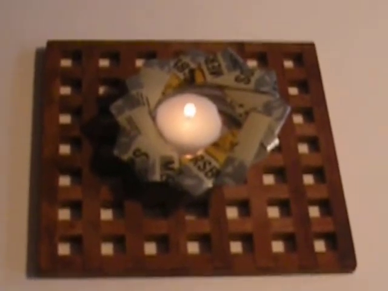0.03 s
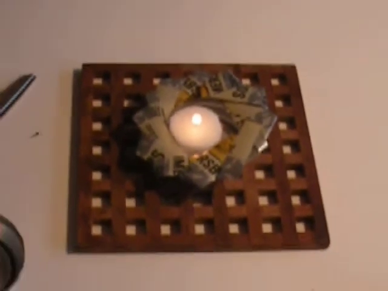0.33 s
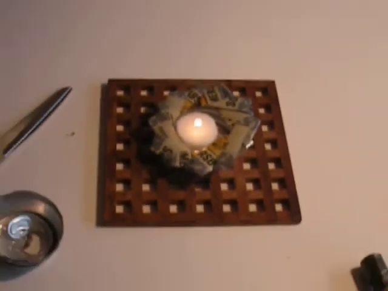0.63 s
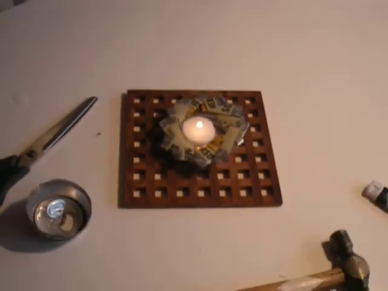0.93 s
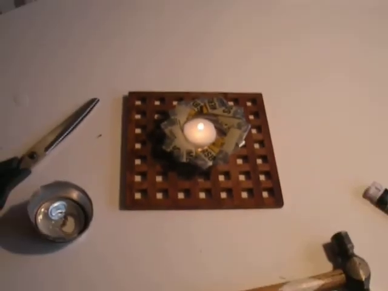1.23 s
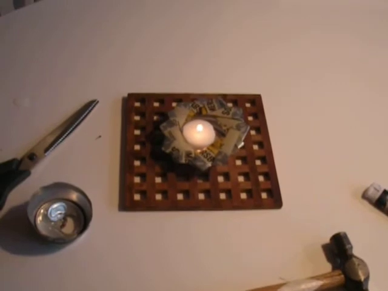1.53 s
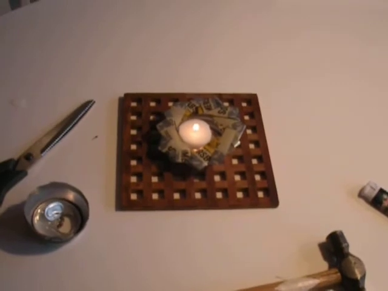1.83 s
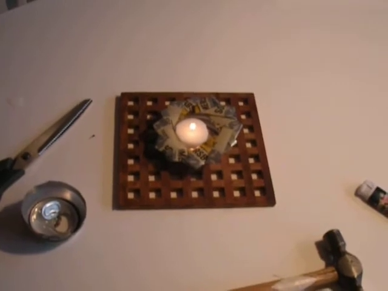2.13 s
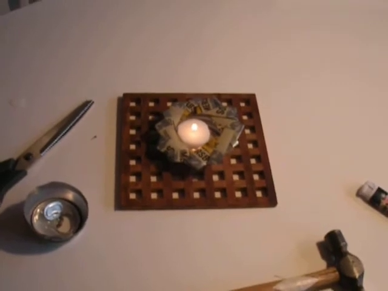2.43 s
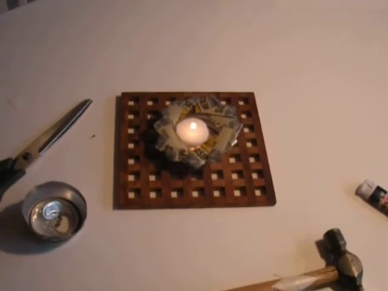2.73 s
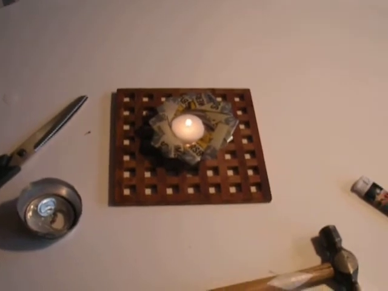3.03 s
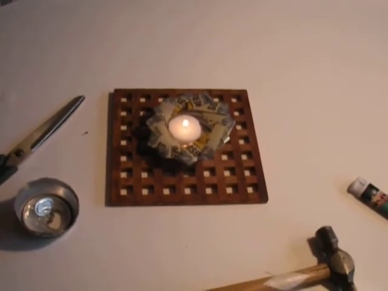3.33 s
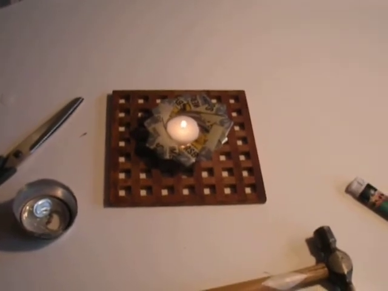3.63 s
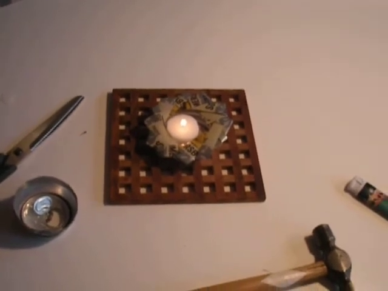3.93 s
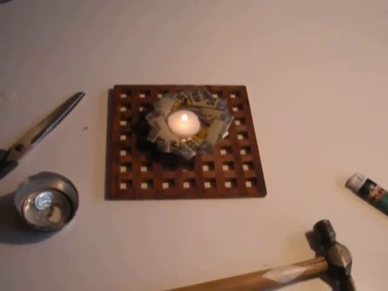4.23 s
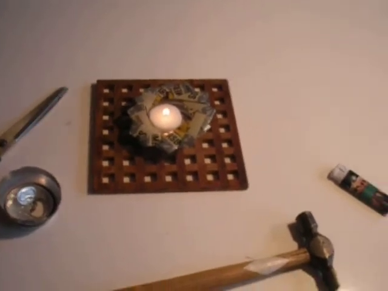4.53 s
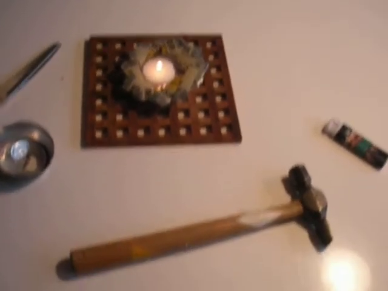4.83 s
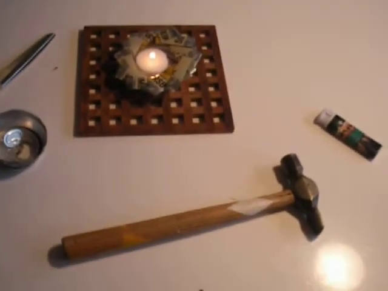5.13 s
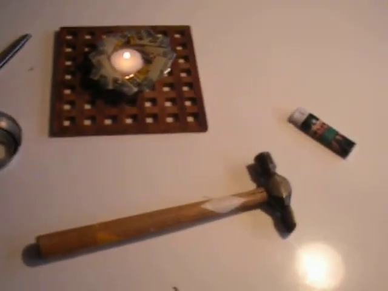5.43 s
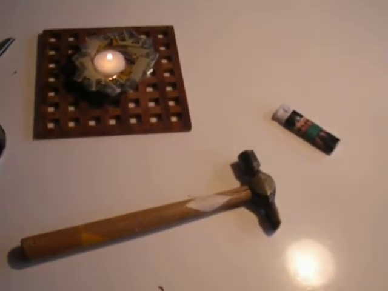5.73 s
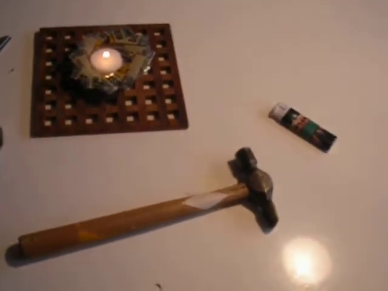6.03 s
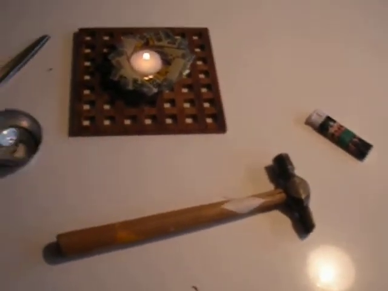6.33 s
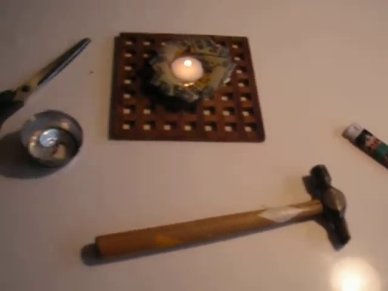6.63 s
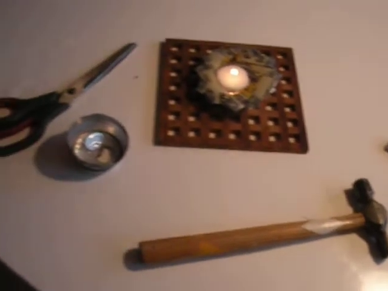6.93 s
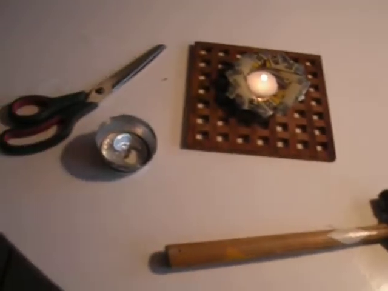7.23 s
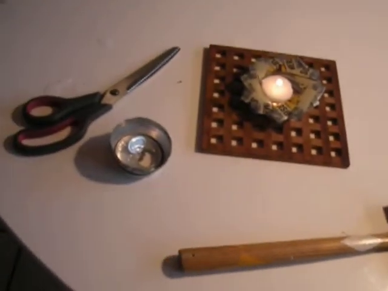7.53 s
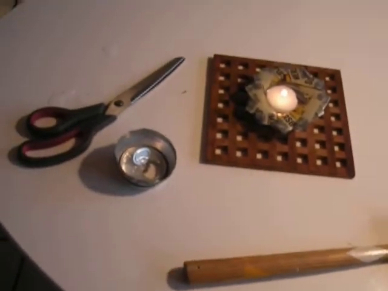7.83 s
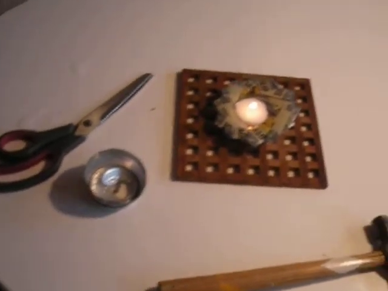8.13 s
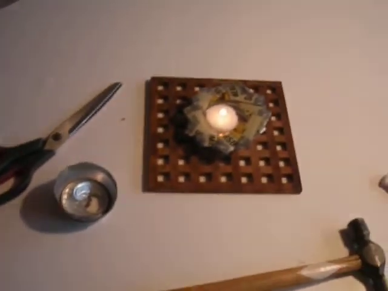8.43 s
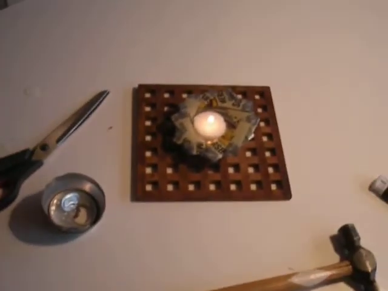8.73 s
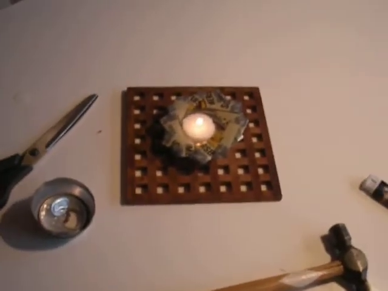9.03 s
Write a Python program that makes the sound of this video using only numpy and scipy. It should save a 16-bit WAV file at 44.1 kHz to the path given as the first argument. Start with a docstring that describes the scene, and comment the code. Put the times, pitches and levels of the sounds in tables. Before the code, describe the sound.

Two sharp clicks from a hand-held camera over steady gritty hiss in a quiet room, followed by a few faint ticks and bumps.

```python
"""A sharp click over gritty hiss in a quiet room, then a second click, light ticks and soft knocks.
Each blow rings the damped modes of a small hand-held camera's case; the hand also rubs it.
Behind: a brief low drone near the end, a very faint clock, appliance hum.
An 8-bit, 8 kHz converter turns the room tone, smaller than one step, into flat two-level hiss."""
import sys
import numpy as np
from scipy import signal
from scipy.fft import rfft, irfft
from scipy.io import wavfile

SR = 44100
rng = np.random.default_rng(int(sys.argv[2]) if len(sys.argv) > 2 else 0)


def master(y):
    """Save y as 16-bit WAV."""
    cut = np.clip(np.atleast_2d(y).T, -1, 1)
    pcm = np.round(cut * 32767)  # scale
    wavfile.write(sys.argv[1], SR, pcm.astype(np.int16))


N = 404397

# case modes, heavily damped, then faint long ones: (frequency [Hz], relative level [dB], t60 [s])
CASE_MODES = [(249, -26.5, 0.023), (419, -17.5, 0.026), (591, -32, 0.059), (740, -16, 0.021),
              (1074, -4.5, 0.01), (1287, -16.5, 0.006), (1864, -5.5, 0.0039), (2281.5, -14.5, 0.0082),
              (2900, -1.8, 0.0063), (3794, -8, 0.0052), (249.7, -54.5, .4), (386.6, -47, .16),
              (440, -46, 0.22), (548, -44, 0.22), (865, -52, 0.28), (1417, -61.5, .2), (3295, -63.5, 0.42)]
# clicks and ticks: (time [s], strength [dB], hardness [dB/octave], node frequency [Hz], node dip [dB])
CASE_CLICKS = [(0.1551, 6, 1.5, 1350, -7), (1.4985, 5.1, 0, 2600, -17.5), (3.1989, -32.5, 10, 2530, -18),
               (3.6642, -43, 13, 2900, -21), (3.6723, -28.5, 1.5, 2500, -19), (3.711, -20, -4.5, 405, -24)]
# fingertip knocks: (time [s], strength [dB])
FINGER_KNOCKS = [(3.831, -37), (4.349, -39.5), (4.371, -38), (4.39, -34), (4.4, -38), (4.425, -37),
                 (8.145, -38.5)]
# hand bumps and rubs: (mid time [s], length [s], level [dB], centre [Hz], width [Hz])
HAND_RUBS = [(3.55, 0.26, -53, 442, 251), (4.391, .12, -48, 460, 174), (8.326, .018, -43, 324, 248)]
# room tone and microphone hiss spectrum: (frequency [Hz], relative density [dB])
HISS_SPECTRUM = [(30, -19.5), (80, -14.5), (130, -4.5), (200, 2), (270, 5), (350, 7.5), (500, 4.5),
                 (700, 3), (1000, .5), (1600, -2), (2600, -3.5), (4000, -5.5), (5000, -29.5)]
# appliance hum: (frequency [Hz], level [dB])
HUM_LINES = [(202, -73.5), (312.2, -66.5), (387, -68)]


def strike(strength_db, hardness_db_per_octave, node_hz=0, dip_db=0):
    """One blow rings the case: harder is brighter; modes with a node at the struck spot stay weak."""
    rise_s, pivot_hz, node_width_hz = .00058, 1000, 447
    t, ring = np.arange(SR // 2) / SR, 0
    for k, (hz, mode_db, t60_s) in enumerate(CASE_MODES):
        near_node = np.exp(-((hz - node_hz) / node_width_hz) ** 2)
        drive_db = strength_db + hardness_db_per_octave * np.log2(hz / pivot_hz) + dip_db * near_node
        polarity = (-1) ** k  # neighbouring modes move in opposite directions
        ring += polarity * amp(mode_db + drive_db) * decay(t, t60_s) * np.sin(2 * np.pi * hz * t)
    return ring * (1 - np.exp(-t / rise_s))


def clicks_and_knocks(low_cut_hz=150):
    """Hard and soft blows on the same case; the tiny microphone passes little bass."""
    blows = np.zeros(N)
    for time_s, *blow in CASE_CLICKS:
        add(blows, time_s, strike(*blow))
    for time_s, strength_db in FINGER_KNOCKS:
        add(blows, time_s, strike(strength_db, hardness_db_per_octave=-7.5))
    low_cut = signal.butter(2, low_cut_hz, "highpass", fs=SR, output="sos")
    return signal.sosfilt(low_cut, blows)


def hand_rubs(t):
    """Soft skin shifting on the case excites only its low resonances."""
    rubs = np.zeros(N)
    for mid_s, length_s, level_db, centre_hz, width_hz in HAND_RUBS:
        swell = np.cos(np.pi * np.clip((t - mid_s) / length_s, -.5, .5)) ** 2
        rub = swell * resonant_noise(centre_hz, width_hz)
        rubs += amp(level_db) * rub * np.linalg.norm(swell) / np.linalg.norm(rub)
    return rubs


def drone(t, start_s=8.935, hz=109.2, rms_db=-56):
    """A brief low sine that swells, holds and dies away."""
    attack_s, hold_s, t60_s = .045, .07, .5
    age_s = t - start_s
    attack = np.clip(age_s / attack_s, 0, 1)
    release = decay(np.maximum(age_s - attack_s - hold_s, 0), t60_s)
    return amp(rms_db) * attack * release * np.sqrt(2) * np.sin(2 * np.pi * hz * t)


def clock(t, start_s=.825, gain_db=-56.5, accent_db=5.5):
    """One distant tick a second, every third stronger, blurred by the room."""
    rise_s, t60_s = .017, .4
    beat, age_s = np.divmod(np.maximum(t - start_s, 0), 1)
    accented = beat % 3 == 1
    strength = amp(gain_db + accent_db * accented)
    envelope = (1 - np.exp(-age_s / rise_s)) * decay(age_s, t60_s)
    return strength * envelope * resonant_noise(centre_hz=1174, width_hz=260)


def appliance_hum():
    """Narrow noise bands, heard as slightly wavering hum lines."""
    return sum(amp(level_db) * resonant_noise(hz, width_hz=5) for hz, level_db in HUM_LINES)


def room_tone(rms_db=-54.5):
    """Steady room and microphone hiss with a broad low hump."""
    hz, density_db = np.transpose(HISS_SPECTRUM)
    return amp(rms_db) * noise(lambda f: amp(np.interp(np.log(f + 1), np.log(hz), density_db)))


def resonant_noise(centre_hz, width_hz):
    """Unit-rms noise in one steep-sided resonance."""
    return noise(lambda f: 1 / (1 + (2 * (f - centre_hz) / width_hz) ** 2))


def noise(gain_at_hz):
    """Unit-rms noise with the given spectral shape."""
    spectrum = rfft(rng.standard_normal(N)) * gain_at_hz(np.fft.rfftfreq(N, 1 / SR))
    shaped = irfft(spectrum, N)
    return shaped / np.sqrt(np.mean(shaped ** 2) + 1e-20)


def decay(age_s, t60_s):
    """Exponential fall, 60 dB per t60_s."""
    return np.exp(-np.log(1000) * age_s / t60_s)


def amp(db):
    """Decibels to gain."""
    return 10 ** (np.asarray(db) / 20)


def add(mix, time_s, sound):
    """Mixes a sound in at time_s."""
    part = mix[round(time_s * SR):][:len(sound)]
    part += sound[:len(part)]


def scene():
    """All sources at one microphone."""
    t = np.arange(N) / SR
    return (room_tone() + appliance_hum() + clicks_and_knocks() + hand_rubs(t) + clock(t) + drone(t))[None]


def record(dry):
    """8-bit conversion at 8 kHz, then back to the full rate."""
    rate_hz, band_limit_hz = 8000, 16700
    step, full_scale = .00555, .72
    slow = signal.resample_poly(dry[0], rate_hz, SR)
    # rounding down flips quiet sound between two neighbouring steps
    quantised = np.clip(step * np.floor(slow / step), -full_scale, full_scale)
    smoothing = signal.firwin(14113, rate_hz / 2, window=("kaiser", 9), fs=np.lcm(SR, rate_hz))
    smooth = signal.resample_poly(quantised, SR, rate_hz, window=smoothing)[:N]
    # overshoot between samples is cut flat: a bright edge on the hardest click
    limited = np.clip(smooth, -full_scale, full_scale)
    low_pass = signal.firwin(511, band_limit_hz, window=("kaiser", 9), fs=SR)
    return signal.oaconvolve(limited, low_pass, "same")[None]


dry = scene()
out = record(dry)
master(out)
```